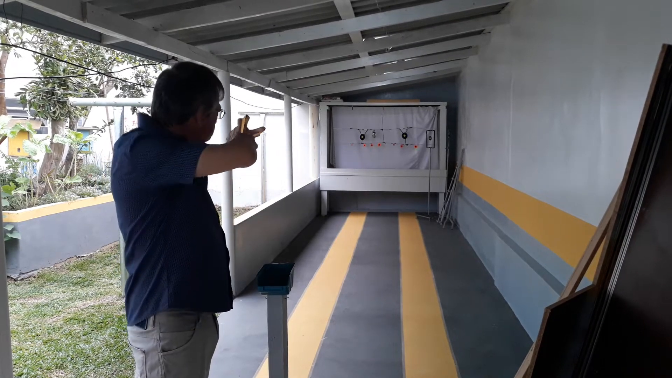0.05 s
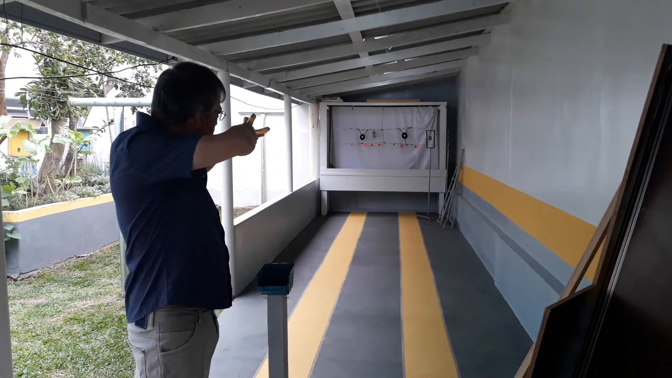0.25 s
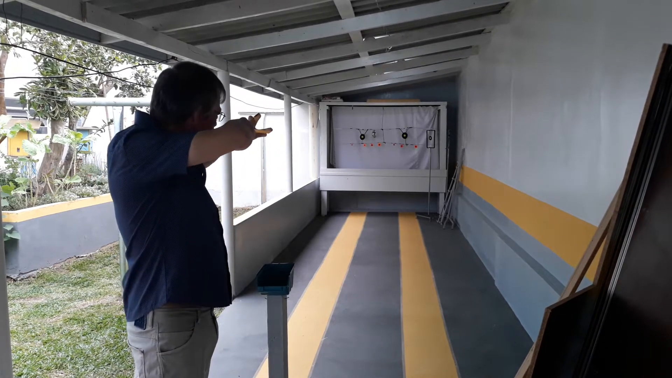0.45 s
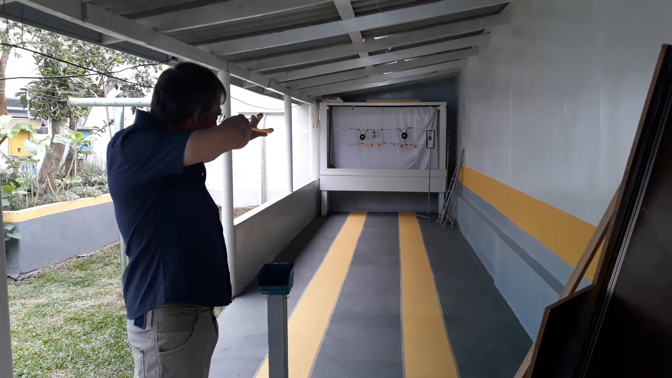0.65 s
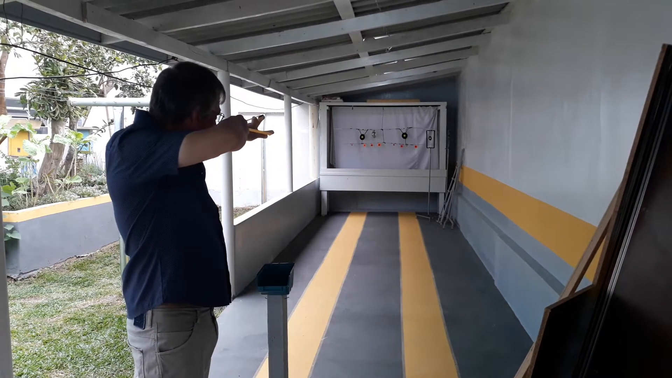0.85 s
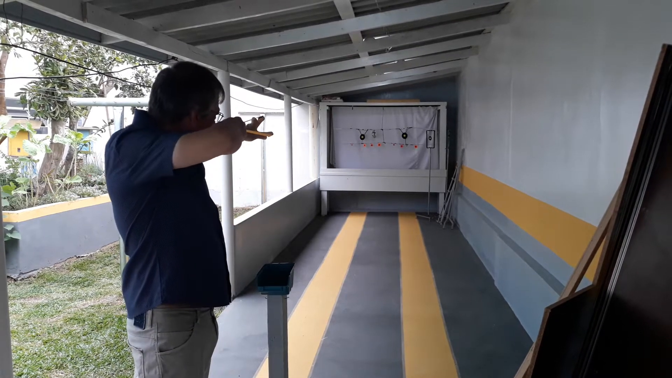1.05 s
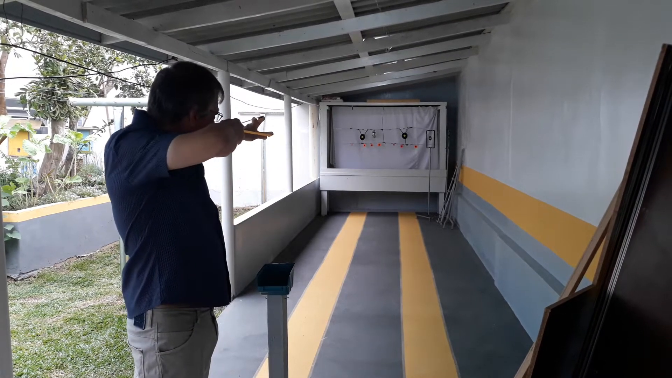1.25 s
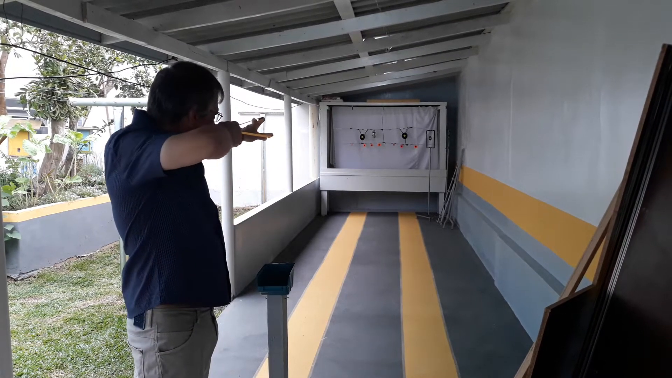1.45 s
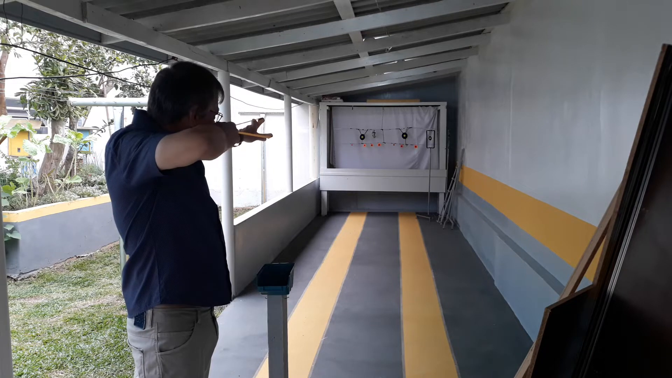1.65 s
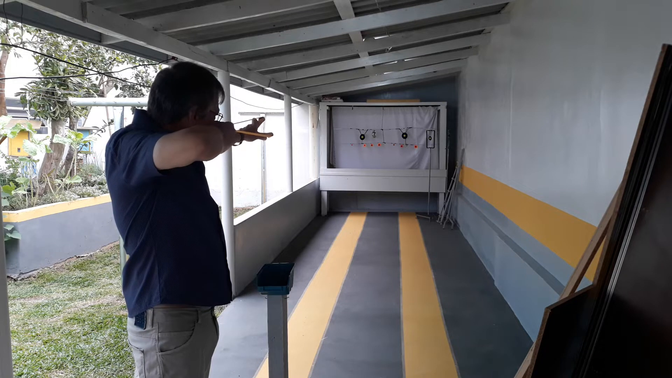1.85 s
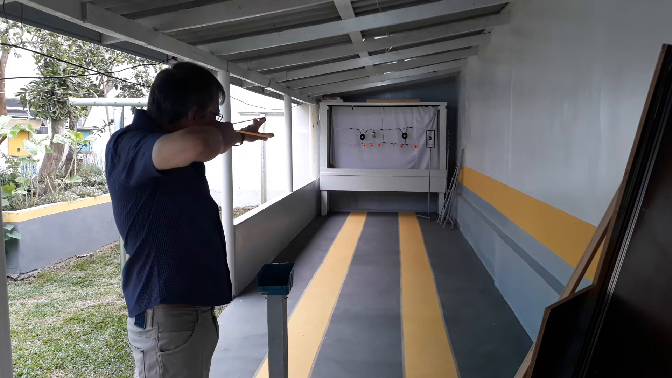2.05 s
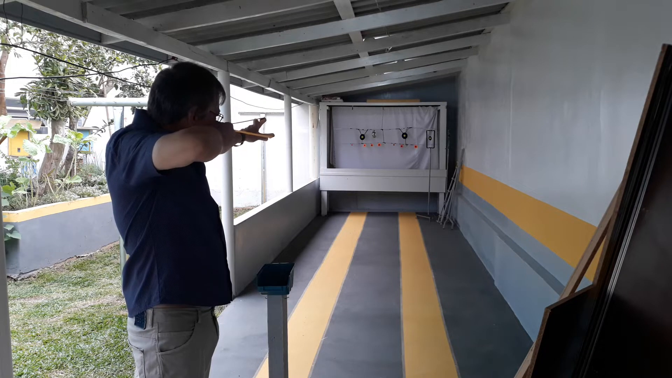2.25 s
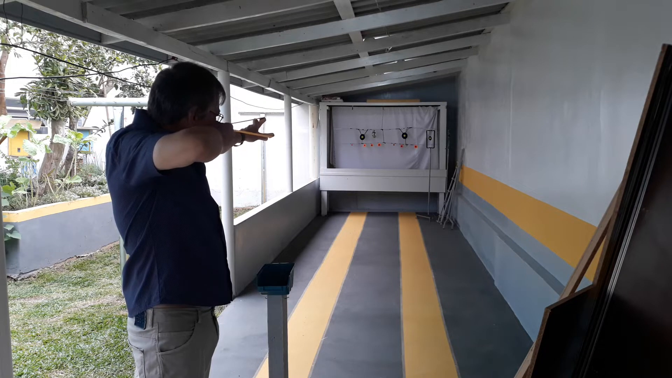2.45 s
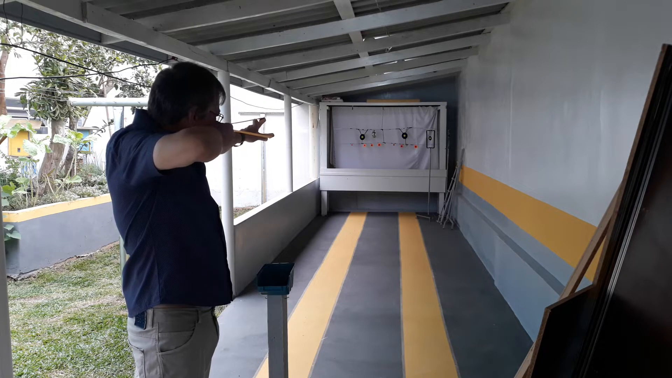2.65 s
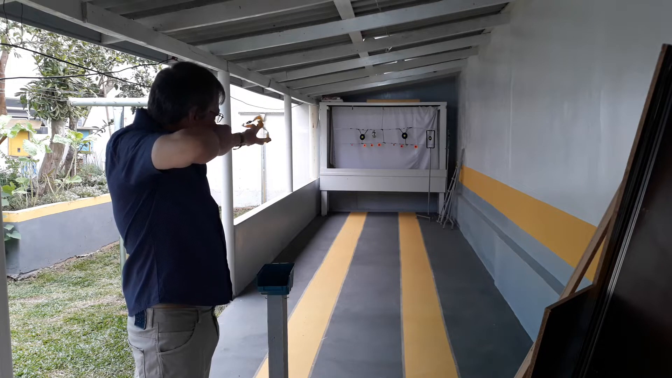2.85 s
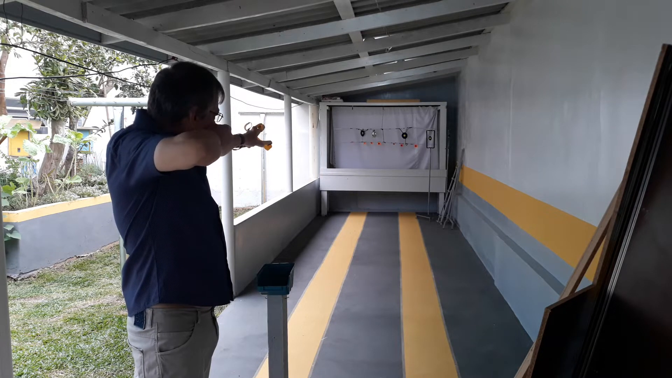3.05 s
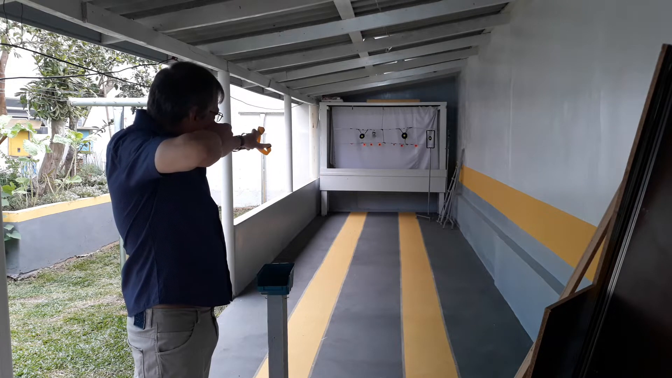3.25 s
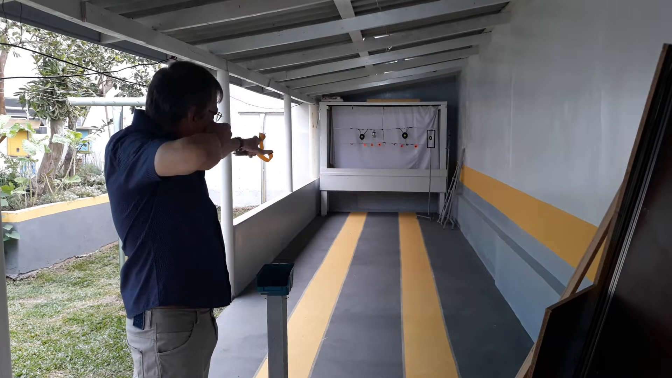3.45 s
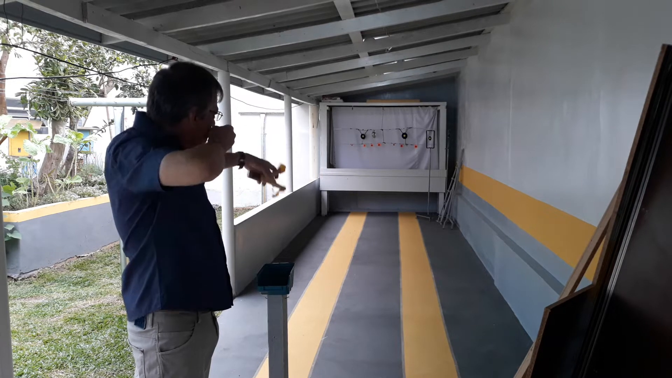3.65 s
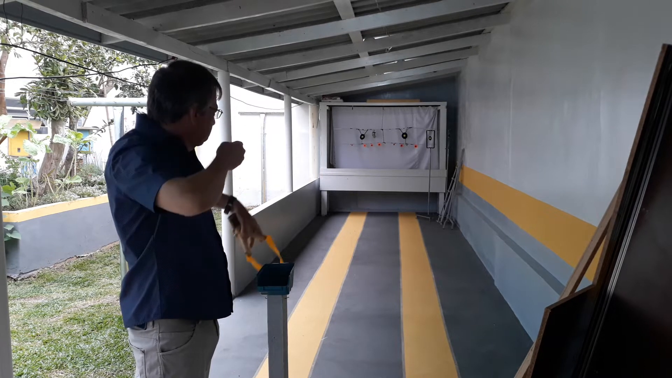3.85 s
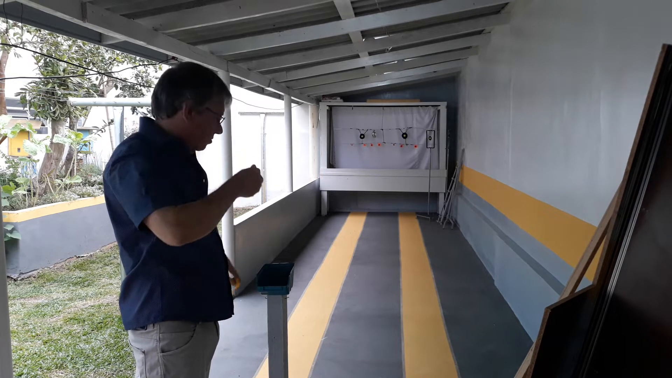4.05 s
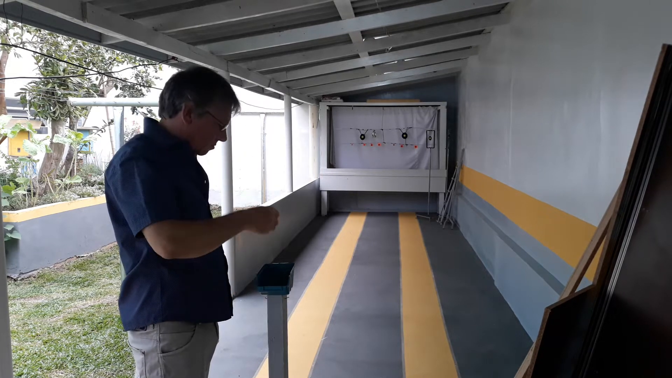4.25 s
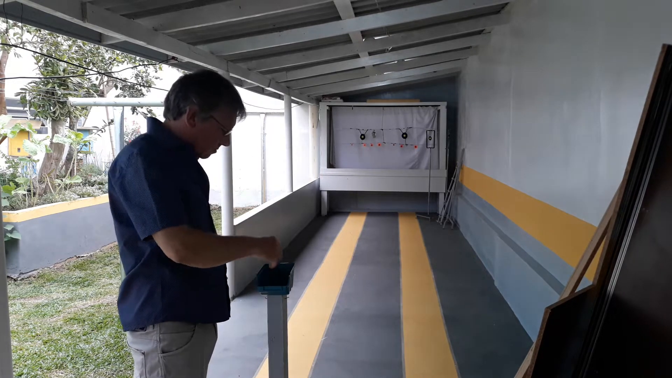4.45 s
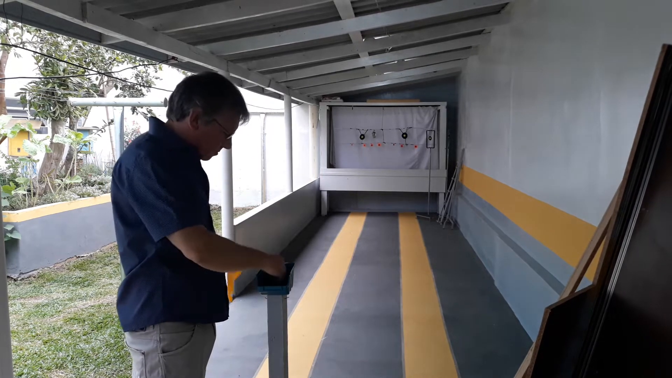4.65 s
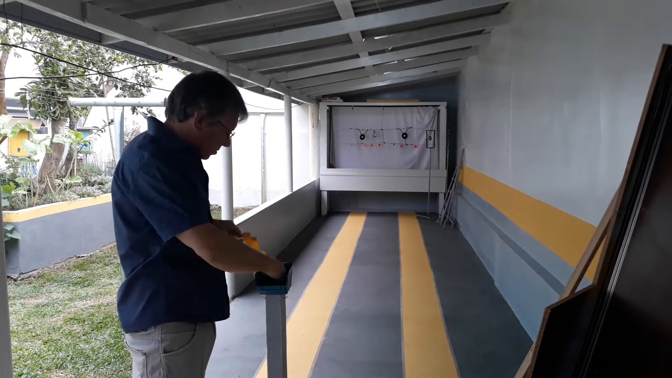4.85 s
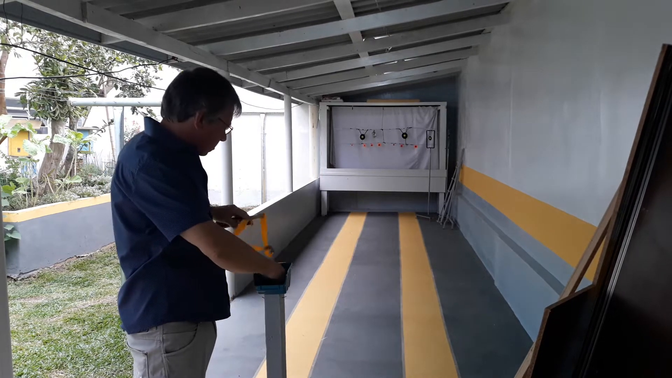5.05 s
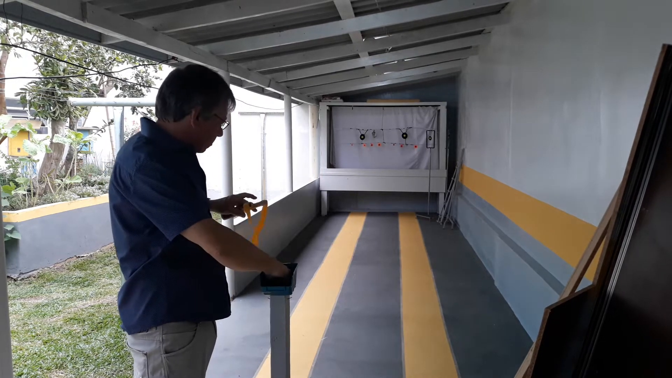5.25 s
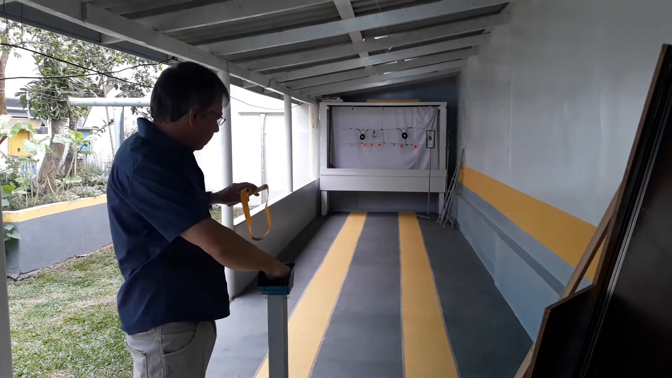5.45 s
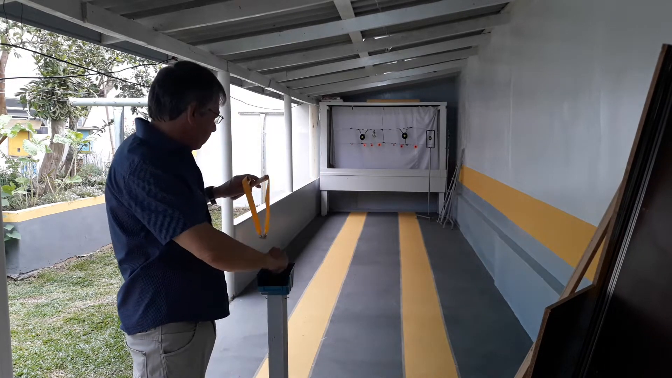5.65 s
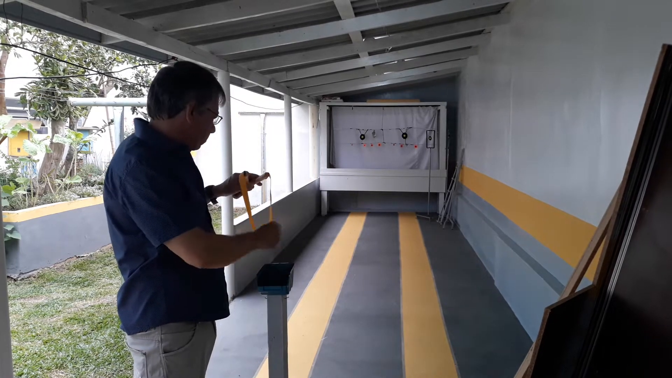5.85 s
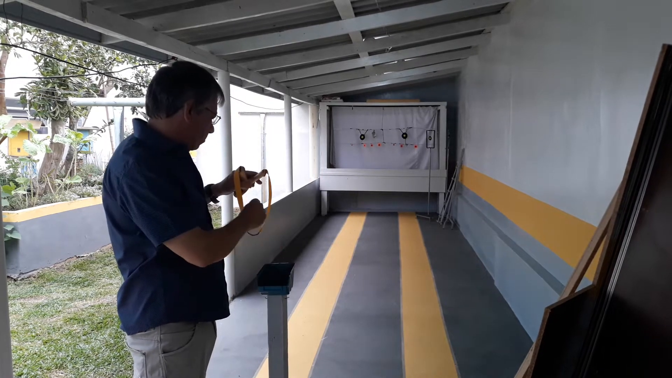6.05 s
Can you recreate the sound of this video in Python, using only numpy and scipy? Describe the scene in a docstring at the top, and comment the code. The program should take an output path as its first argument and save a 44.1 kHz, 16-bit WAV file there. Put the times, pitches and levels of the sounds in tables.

```python
"""Slingshot in a roofed lane

A slingshot is fired down a roofed concrete lane in a back yard. Decaying noise makes the lane's echoes.
Rubber bands whip and slap as coloured clicks; the ball smacks the target, whose plate and box ring as
decaying partials, then drops and bounces three times, the last with a metal clink. A hand scuffs in a tray.
Bird notes are gliding tones over a far motor's drone, filtered-noise yard air and rubbing clothes.
The recorder's gain ducks at the shot."""
import sys
import numpy as np
from scipy import signal
from scipy.fft import rfft, irfft
from scipy.io import wavfile
from scipy.ndimage import uniform_filter1d

SR = 44100
rng = np.random.default_rng(int(sys.argv[2]) if len(sys.argv) > 2 else 0)


def output_pcm(signal):
    """Save a mono or channel-first signal as 16-bit PCM at the path in sys.argv[1].

    Samples are clipped to [-1, 1] before scaling.
    """
    pcm = np.clip(np.atleast_2d(signal).T, -1, 1) * 32767
    wavfile.write(sys.argv[1], SR, np.round(pcm).astype(np.int16))


N = 269451
TIME = np.arange(N) / SR


def amp(db):
    """Amplitude factor of a level in dB."""
    return 10 ** (np.asarray(db) / 20)


def rms_one(x):
    """The sound scaled to an RMS of 1."""
    return x / np.sqrt(np.mean(x ** 2) + 1e-20)


def curve(rows):
    """Straight lines between (t/s, value) points, over the whole scene."""
    return np.interp(TIME, *np.transpose(rows))


def at_hz(points, hz):
    """Straight lines between (f/Hz, value) points on a logarithmic frequency axis."""
    known_hz, values = np.transpose(points)
    return np.interp(np.log(np.maximum(hz, 1)), np.log(known_hz), values)


def convolve(x, response):
    """The sound passed through a response, cut to the scene's length."""
    return signal.fftconvolve(x, response)[:N]


def drift(rate_hz):
    """Random wandering, slower than about rate_hz, with an RMS of 1."""
    hz = np.fft.rfftfreq(N, 1 / SR)
    smoothing = 1 / (1 + (hz / rate_hz) ** 2) ** 2
    return rms_one(irfft(rfft(rng.standard_normal(N)) * smoothing, N))


def colour(x, spectrum, size=4096):
    """Causal (minimum-phase) filter of unit energy with the given spectrum."""
    log_gain = np.log(amp(at_hz(spectrum, np.fft.rfftfreq(size, 1 / SR))))
    cepstrum = irfft(log_gain)
    # folding the cepstrum forward puts the energy as early as possible
    cepstrum[1:size // 2] *= 2
    cepstrum[size // 2 + 1:] = 0
    response = irfft(np.exp(rfft(cepstrum)))
    return convolve(x, response / np.linalg.norm(response))


def clicks(rows):
    """One impulse for each (t/s, level/dB)."""
    out = np.zeros(N)
    for s, db in rows:
        out[int(s * SR)] += amp(db)
    return out


def ring(modes):
    """One second of decaying partials after a unit blow."""
    t = TIME[:SR]
    out = 0
    for hz, db, t60 in modes:
        out = out + amp(db - 60 * t / t60) * np.cos(2 * np.pi * hz * t)
    return out


def place(s, sound):
    """The sound starting at s seconds."""
    return np.pad(sound, (int(s * SR), N))[:N]


# how long the concrete lane rings in each band: f/Hz, t60/s
LANE_DECAY = [(100, 0.7), (250, 0.88), (500, 0.51), (1000, 0.48), (2500, 0.56), (5000, 0.51), (8000, 0.47),
              (13000, 0.32)]


def echoes(build_s):
    """Reflections between wall, floor and roof build up, then die band by band; unit energy."""
    t, hz = TIME[:SR], np.fft.rfftfreq(SR, 1 / SR)
    white = rfft(rng.standard_normal(SR))
    centres_hz = np.array(LANE_DECAY)[:, 0]
    tail = 0
    # each row of the identity is one band's share, crossfading into its neighbours
    for share, (_, t60) in zip(np.eye(len(LANE_DECAY)), LANE_DECAY):
        band = irfft(white * at_hz(np.c_[centres_hz, share], hz))
        tail = tail + band * amp(-60 * t / t60)
    tail = tail * np.sqrt(1 - np.exp(-t / build_s))
    return tail / np.linalg.norm(tail)


# far motor's drone, before the throb: t/s, level/dB
DRONE_LEVEL = [(0, -72), (.9, -62.5), (1.4, -51.5), (1.8, -55.5), (2.05, -45.5), (2.6, -53.5), (3.05, -44),
               (3.5, -56.5), (4.55, -54), (4.85, -46.5), (5.55, -54.5), (6.11, -52.5)]
# its mean firing rate: t/s, f/Hz
FIRING_RATE = [(0, 135.7), (1.4, 140.2), (2.7, 148.5), (4.3, 149.7), (5.0, 143.6), (6.11, 145.5)]


def motor(wander=.012, throb_db=1.5, half_db=-19, one_and_half_db=-17):
    """A far engine: its firing tone wavers and throbs, with weak half orders below and above."""
    firing_hz = curve(FIRING_RATE) * (1 + wander * drift(14))
    phase = 2 * np.pi * np.cumsum(firing_hz) / SR
    below = amp(half_db) * np.sin(phase / 2)
    above = amp(one_and_half_db) * np.sin(phase + phase / 2)
    return amp(curve(DRONE_LEVEL) + throb_db * drift(11)) * (np.sin(phase) + below + above)


# sleeves and rubber rubbing while drawing and reloading: t/s, peak level/dB before the grain
RUB_MOVES = [(.2, -63.5), (1.45, -59.5), (1.98, -58.5), (2.4, -64.5), (2.7, -62.5), (4.83, -63.5),
             (5.25, -65), (5.55, -68)]
RUB_RISE_DB_PER_S, RUB_FALL_DB_PER_S, CLOTH_REST_DB = 88, 19, -68.5


def rubbing():
    """Gain of the clothes' rustle: each move swells quickly and dies slowly back to rest."""
    moves_db = []
    for s, db in RUB_MOVES:
        rise_db = RUB_RISE_DB_PER_S * (s - TIME)
        fall_db = RUB_FALL_DB_PER_S * (TIME - s)
        moves_db.append(db - np.maximum(rise_db, fall_db))
    return amp(np.maximum(np.max(moves_db, axis=0), CLOTH_REST_DB))


# spectrum of traffic and garden air: f/Hz, relative level/dB
AIR_SPECTRUM = [(15, -44), (25, -31.5), (60, -9), (102, -17), (139, -3.5), (171, -14), (206, -5),
                (325, -13), (368, -15), (452, -16), (1010, -28), (1920, -36.5), (3500, -39.5), (4550, -71),
                (7700, -120)]
# spectrum of the thin hiss: f/Hz, relative level/dB
HISS_SPECTRUM = [(2500, -5), (4500, 4), (7000, -2), (8700, -5.5), (9400, -13.5), (11000, -10.5),
                 (13000, -4.5), (15500, -1)]
# spectrum of the clothes' rustle: f/Hz, relative level/dB
CLOTH_SPECTRUM = [(400, -3), (750, -0.5), (1300, 8.5), (2200, -1.5), (3200, -4.5), (5000, 9), (7000, -3),
                  (8700, -4.5), (9500, -18), (11000, -18), (13000, -7.5), (15500, -14)]


def yard(traffic_db=-56, hiss_db=-71, lumps_db=0.26, grain_db=1.0):
    """Noise in three colours: traffic rumble, a thin steady hiss and the grainy rub of clothes."""
    low, high, rub = rng.standard_normal((3, N))
    rumble = amp(traffic_db + lumps_db * drift(4.7)) * colour(low, AIR_SPECTRUM)
    rustle = rubbing() * amp(grain_db * drift(60)) * colour(rub, CLOTH_SPECTRUM)
    return rumble + rustle + amp(hiss_db) * colour(high, HISS_SPECTRUM)


# the bird's phrases, each an arch of evenly spaced notes:
# start t/s, spacing/s, steps up, steps down, top f/Hz, closing f/Hz, mid-phrase level/dB, swell per note/dB
BIRD_PHRASES = [(0.184, 0.12, 1, 1, 6690, 6200, -59.5, 2.5), (.56, 0.13, 2, 1, 6690, 5650, -57, -0.5),
                (1.115, 0.1, 2, 3, 7170, 5640, -57.5, -0.8), (1.868, .11, 2, 1, 7380, 6800, -51, 4.5),
                (2.35, .129, 2, 1, 6604, 5800, -49.5, -0.5), (3.19, 0.11, 1, 1, 6820, 6670, -54, -4.5),
                (4.2, 0.11, 1, 0, 6276, 6225, -60.5, 0), (4.64, .124, 1, 2, 7020, 5795, -57, 1.5),
                (5.155, 0.14, 1, 2, 6634, 5090, -55.5, -1.5), (5.76, 0.11, 2, 0, 6730, 6730, -57, 0.5)]
OPENING_HZ, ARCH_BEND = 5700, 1.4   # every phrase opens on this pitch; above 1 the arch is rounded
NOTE_S, SLUR_TO_HZ = .08, 4300   # every phrase note is held, then slurred down to the same pitch
# single chips of other birds: t/s, starting f/Hz, level/dB
BIRD_CHIPS = [(0.0, 3520, -65), (.84, 8800, -79), (1.896, 8540, -69), (2.235, 8800, -67.5),
              (2.366, 7180, -57.5), (2.635, 8700, -65)]
CHIP_S, CHIP_DROP = 0.068, .09   # length; share by which the pitch falls


def song():
    """The notes as (t/s, length/s, first f/Hz, last f/Hz, level/dB): single chips and arched phrases."""
    notes = [(s, CHIP_S, hz, hz * (1 - CHIP_DROP), db) for s, hz, db in BIRD_CHIPS]
    for start, spacing, up, down, top_hz, closing_hz, db, swell_db in BIRD_PHRASES:
        below_top = np.linspace(1, 0, round(up) + 1) ** ARCH_BEND
        climb = top_hz - (top_hz - OPENING_HZ) * below_top
        past_top = np.linspace(0, 1, round(down) + 1)[1:] ** ARCH_BEND
        descent = top_hz - (top_hz - closing_hz) * past_top
        for k, hz in enumerate(np.r_[climb, descent]):
            note_db = db + swell_db * (k - (up + down) / 2)
            notes.append((start + k * spacing, NOTE_S, hz, SLUR_TO_HZ, note_db))
    return notes


def bird(warble=0.075, fade_db=4, overtone_db=-31, direct_db=-20):
    """Thin notes that start clean and fall away in a rough twitter, smeared by the echoes under the roof."""
    out = np.zeros(N)
    waver = warble * drift(700)
    for s, length, first_hz, last_hz, db in song():
        span = (TIME >= s) & (TIME < s + length)
        along = (TIME[span] - s) / length
        # the pitch lingers on top, then drops faster and faster
        glide_hz = first_hz + (last_hz - first_hz) * along ** 2
        phase = 2 * np.pi * np.cumsum(glide_hz * (1 + waver[span] * along)) / SR
        # quick start and end, weakening between them as the pitch falls
        edges = np.minimum(10 * np.minimum(along, 1 - along), 1)
        swell = edges * amp(fade_db * (.5 - along))
        tone = np.sin(phase) + amp(overtone_db) * np.sin(2 * phase)
        out[span] += amp(db) * swell * tone
    return np.sqrt(2) * (amp(direct_db) * out + convolve(out, echoes(build_s=0.026)))


# bands whipping past the fork and slapping back: t/s, energy level/dB of each slap's echoes
BAND_SLAPS = [(2.8129, 8), (2.8162, 16), (2.819, 21.5), (2.836, 23.5), (2.8462, 20), (2.8597, 21),
              (2.876, 11)]
# spectrum of slapping rubber: f/Hz, relative level/dB
RUBBER_SPECTRUM = [(40, -52.5), (100, -23.5), (220, -11.5), (350, -13), (850, -11), (1430, -6.5),
                   (1950, -7), (2500, -1.5), (3400, -4.5), (5000, 2.5), (6300, -2), (7700, 2.5), (8800, -2),
                   (9700, -9.5), (13000, -4.5)]


def bands(direct_db=-21):
    """A quick volley of bright slaps, each from a new spot and so with echoes of its own."""
    reflected = 0
    for s, db in BAND_SLAPS:
        reflected = reflected + amp(db) * place(s, echoes(build_s=.001))
    direct = amp(direct_db) * clicks(BAND_SLAPS)
    return colour(direct + reflected, RUBBER_SPECTRUM)


# ball on the target, straight and by floor, wall and roof: t/s, energy level/dB
STRIKE_ARRIVALS = [(2.995, 10), (2.9962, 15), (3.0008, 7), (3.0012, 14.5)]
# spectrum of the smack: f/Hz, relative level/dB
SMACK_SPECTRUM = [(40, -69.5), (100, -23), (240, -11.5), (340, -17.5), (450, -6), (680, -7.5), (850, -4),
                  (1900, 1.5), (2600, 1.5), (4300, -5), (6400, -15), (8600, -16), (9600, -27.5),
                  (13000, -18.5)]
# partials of the target plate: f/Hz, relative level/dB, t60/s
PLATE_MODES = [(1006, -7.5, .3), (1580, -7, 0.17), (1760, -3.5, 0.08), (2110, -7, .22), (2480, -9, .28),
               (2530, -17, .28), (2708, -27.5, 0.27), (3250, -8, 0.096), (4600, -3, 0.18)]
# partials of the box panels behind it: f/Hz, relative level/dB, t60/s
BOX_MODES = [(138.2, -21.5, 0.5), (188.8, -4.5, 0.22), (224.4, -3.5, 0.68), (244, -7.5, 0.607),
             (255.6, -3.5, 0.573), (285.8, -15.5, 0.45), (421, -2, 0.8)]


def target(wet_db=24.0, shudder_db=-9, shudder_t60=0.29, plate_db=-44, box_db=-56.0, swell_s=0.13):
    """The smack and first echoes stand out, the board shudders briefly, plate and box ring into the lane."""
    hit_s = STRIKE_ARRIVALS[0][0]
    shudder = rng.standard_normal(SR) * amp(-60 * TIME[:SR] / shudder_t60)
    shudder = amp(shudder_db) * shudder / np.linalg.norm(shudder)
    spread = amp(wet_db) * place(hit_s, shudder + echoes(build_s=0.0043))
    # the heavy panels take a moment to get going
    slow_spread = amp(wet_db) * place(hit_s, echoes(build_s=swell_s))
    boom = convolve(slow_spread, amp(box_db) * ring(BOX_MODES))
    smack = colour(clicks(STRIKE_ARRIVALS) + spread, SMACK_SPECTRUM)
    plate = convolve(spread, amp(plate_db) * ring(PLATE_MODES))
    return smack + plate + boom


# the fallen ball: t/s, energy level/dB of the echoes, dulled above f/Hz, metal clink level/dB
BALL_BOUNCES = [(3.6148, 15, 6300, -46), (3.956, 5.5, 9550, -67), (4.116, -8, 10160, -19.5)]
# spectrum of the knock: f/Hz, relative level/dB
KNOCK_SPECTRUM = [(50, -39), (100, -37), (150, -6), (300, -12), (400, 1), (550, -4), (880, -1), (1300, -2),
                  (2250, -0.5), (5000, 0), (8600, -15), (9500, -30), (13000, -20), (15500, -9.5)]
# partials of the metal clink: f/Hz, relative level/dB, t60/s
CLINK_MODES = [(3830, 1.5, 0.017), (3937, 3.5, 0.021), (4900, -1, .02), (8000, -40, 0.021)]


def bounces(direct_db=-24):
    """Hard knocks at the far end, heard mostly through their reflections."""
    out = 0
    for s, db, top_hz, clink_db in BALL_BOUNCES:
        direct = clicks([(s, db + direct_db)])
        contact = direct + amp(db) * place(s, echoes(build_s=0.014))
        soften = signal.butter(2, min(top_hz, .45 * SR), fs=SR, output="sos")
        knock = signal.sosfilt(soften, colour(contact, KNOCK_SPECTRUM))
        clink = amp(clink_db) * convolve(contact, ring(CLINK_MODES))
        out = out + knock + clink
    return out


# a hand scuffing in the ammunition tray and along the rubber: t/s, length/s, resonance f/Hz, level/dB
HAND_SCUFFS = [(4.722, 0.12, 875, -57.5), (4.94, 0.039, 1640, -57.5), (4.948, .05, 972, -58),
               (5.19, .1, 3474, -63.5)]


def reload(width=0.092):
    """Short rubs, each heard through one resonance of the thing touched; width is a share of its pitch."""
    out = 0
    for s, length, hz, db in HAND_SCUFFS:
        body = signal.butter(2, [hz * (1 - width), hz * (1 + width)], "band", fs=SR, output="sos")
        swell = np.sin(np.pi * np.clip((TIME - s) / length, 0, 1))
        rub = rms_one(signal.sosfilt(body, rng.standard_normal(N)))
        out = out + amp(db) * swell * rub
    return convolve(out, echoes(build_s=0.0034))


def scene():
    """All the sounds as they meet at one microphone."""
    background = motor() + yard() + bird()
    shot = bands() + target() + bounces()
    return (background + shot + reload())[None]


def record(dry, limit_db=-11, release_db_per_s=3.0, attack_s=0.0044, cutoff_hz=15800):
    """Gain drops on loud sound and creeps back; the highest peaks are rounded and the top is cut."""
    power = uniform_filter1d(dry[0] ** 2, size=300)
    level_db = 10 * np.log10(np.abs(power) + 1e-12)
    # the running maximum on a rising slope holds each duck and lets it go steadily
    recovery_db = release_db_per_s * TIME
    excess_db = np.maximum(level_db - limit_db, 0)
    duck_db = np.maximum.accumulate(excess_db + recovery_db) - recovery_db
    pole = np.exp(-1 / (attack_s * SR))
    held = dry * amp(-signal.lfilter([1 - pole], [1, -pole], duck_db))
    rounded = held / (1 + (held / .9) ** 6) ** (1 / 6)
    low_pass = signal.ellip(12, .1, 80, cutoff_hz, fs=SR, output="sos")
    return signal.sosfilt(low_pass, rounded)


dry = scene()
out = record(dry)
output_pcm(out)
```